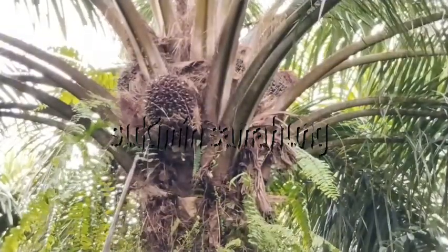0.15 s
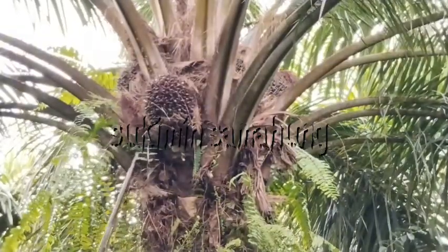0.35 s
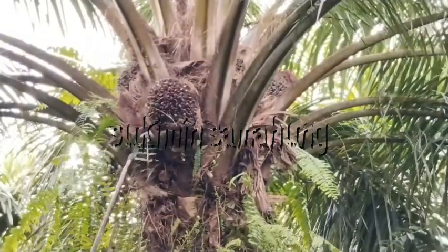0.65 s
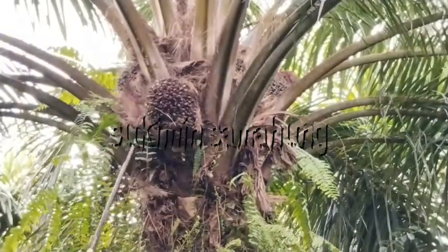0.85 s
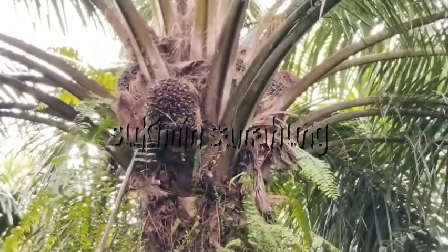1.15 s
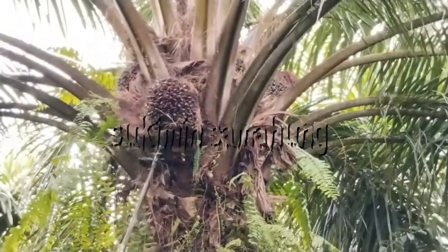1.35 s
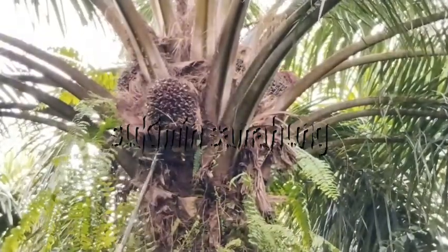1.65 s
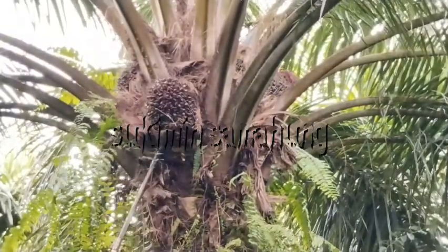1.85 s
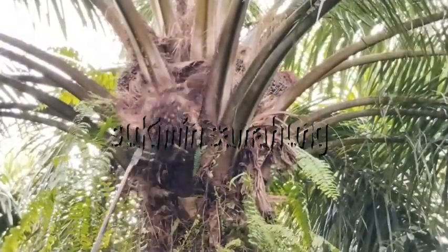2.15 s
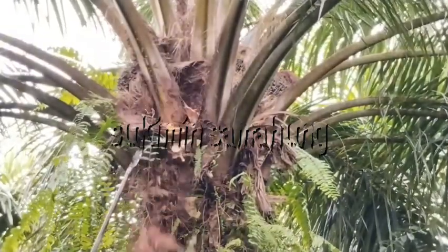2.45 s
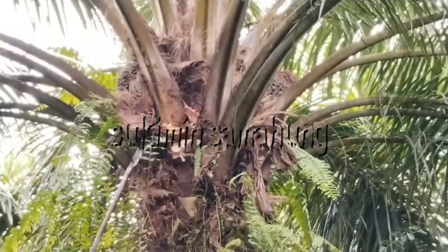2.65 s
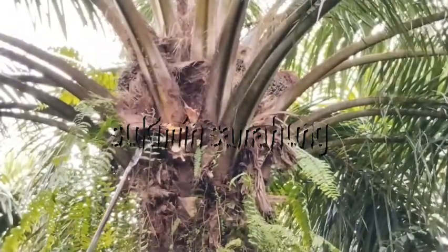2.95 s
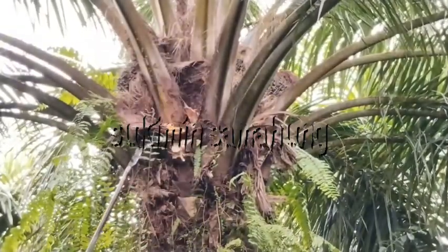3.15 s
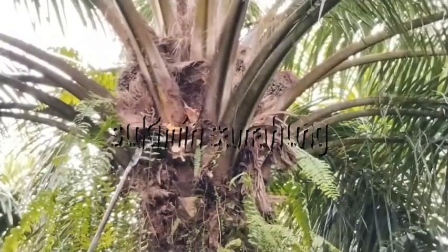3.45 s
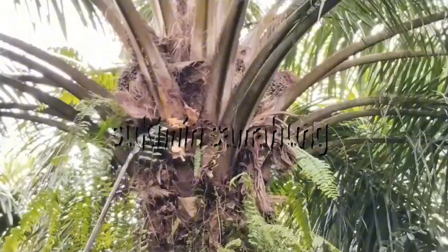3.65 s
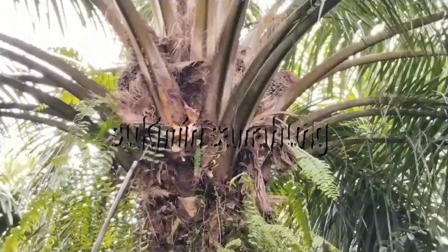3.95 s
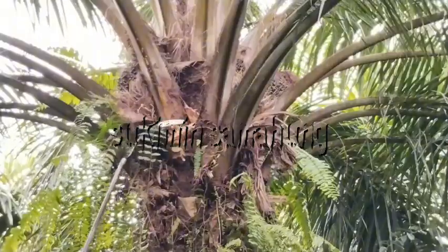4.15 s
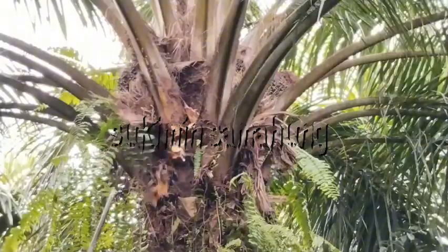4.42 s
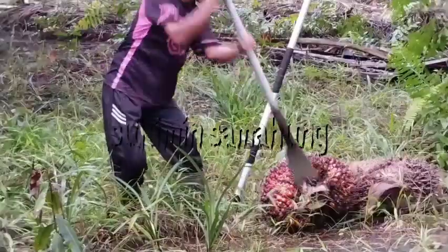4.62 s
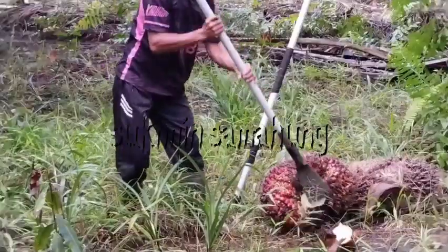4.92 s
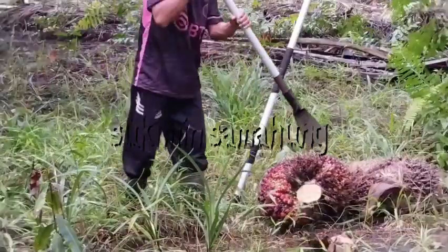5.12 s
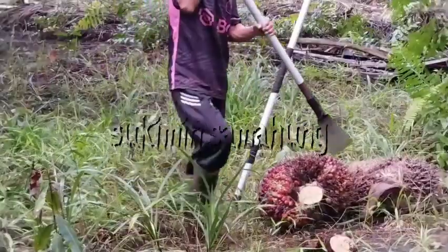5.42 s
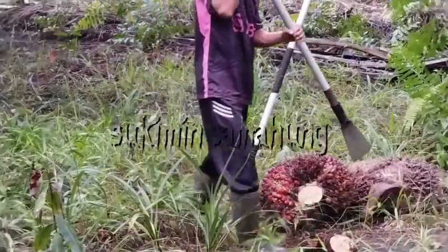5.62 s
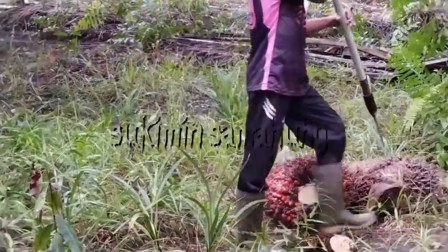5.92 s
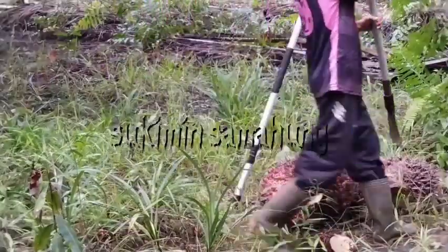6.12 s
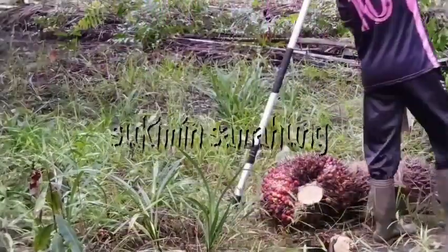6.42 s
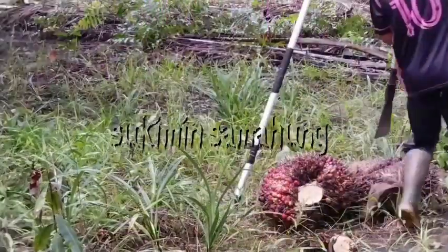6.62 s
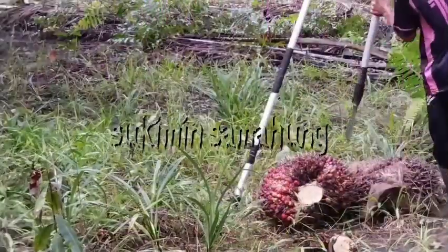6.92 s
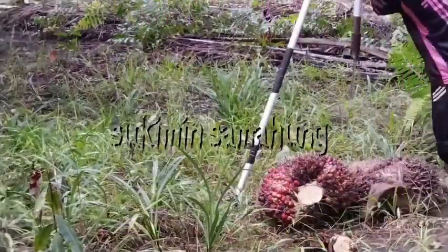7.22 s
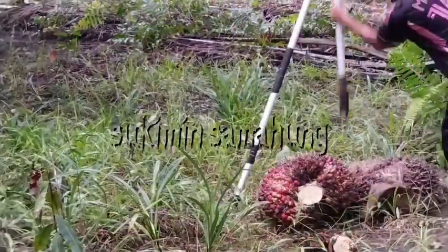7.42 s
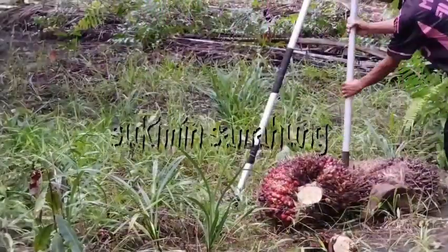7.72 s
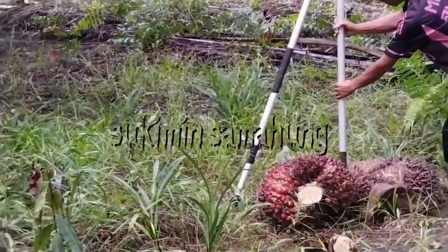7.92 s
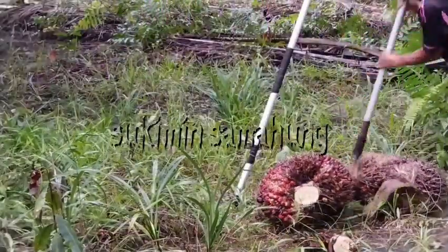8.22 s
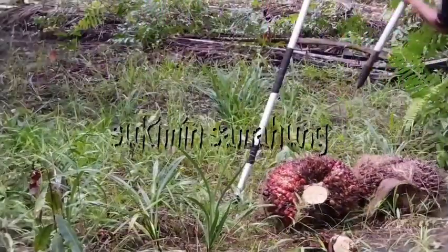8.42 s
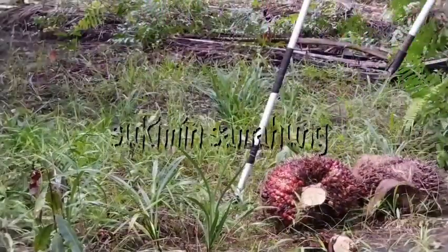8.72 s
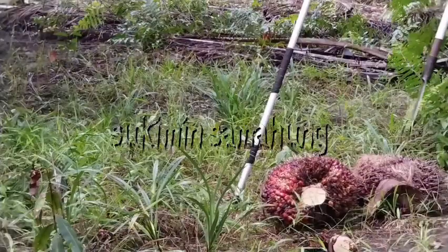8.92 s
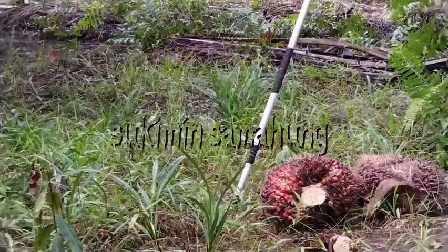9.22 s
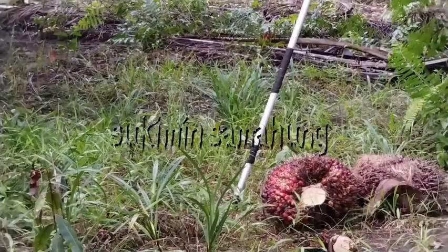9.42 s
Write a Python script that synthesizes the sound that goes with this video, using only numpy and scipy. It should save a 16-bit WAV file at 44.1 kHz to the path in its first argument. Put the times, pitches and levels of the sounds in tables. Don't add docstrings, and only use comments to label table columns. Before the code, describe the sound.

In a palm grove, a blade on a hollow pole scrapes and knocks among dry fibres. One hard cut, then a heavy fruit bunch thuds to the ground and crackling debris follows. After a tiny silence, a chisel chops a stalk, boots scuff through grass, and a second softer chop follows. Far cicadas, small birds and light wind; mono phone microphone a few steps away.

```python
import sys
import numpy as np
from scipy import signal
from scipy.fft import rfft, irfft, next_fast_len
from scipy.io import wavfile
from scipy.ndimage import uniform_filter1d, map_coordinates

SR = 44100
rng = np.random.default_rng(int(sys.argv[2]) if len(sys.argv) > 2 else 0)


def convert_level_to_amplitude(level_db):
    exponent = np.asarray(level_db, float) / 20
    return 10 ** exponent


def unload_audio(sound):
    columns = np.transpose(np.atleast_2d(sound))
    steps = np.round(np.clip(columns, -1, 1) * 32767)
    wavfile.write(sys.argv[1], SR, steps.astype(np.int16))


N = 421596


def level(x):
    return x / np.sqrt(np.mean(x ** 2))


def band(x, hz, width_hz):
    edges = np.clip([hz - width_hz / 2, hz + width_hz / 2], 15, .45 * SR)
    return signal.sosfilt(signal.butter(2, edges, "band", fs=SR, output="sos"), x)


def curve(rows):
    s, *columns = np.transpose(rows)
    return [np.interp(np.arange(N) / SR, s, c) for c in columns]


def walk(rate, size=N):
    k = int(SR / rate)
    steps = np.repeat(rng.standard_normal(size // k + 1), k)
    return level(uniform_filter1d(uniform_filter1d(steps, k), k)[:size])


def add(out, s, x):
    i = int(s * SR)
    out[i:i + len(x)] += x[:N - i]


def decay(t, t60):
    return np.exp(-np.log(1000) * t / t60)


def ring(hz, t60, rise=0.0006, grip=1.5):
    t = np.arange(SR // 4) / SR
    u = t / max(t60, .005)
    build = 1 - np.exp(-(t / rise) ** 2)
    return np.sin(2 * np.pi * hz * t) * build * np.exp(-np.log(1000) * (0.99 * u + grip * u ** 2))


def scuff(x, noise, length):
    grating = noise * np.exp(-np.arange(len(noise)) / SR / max(length, 1e-4))
    y = signal.fftconvolve(x, grating)
    return y * np.linalg.norm(x) / np.linalg.norm(y)


def grove(x, t60, wet_db):
    t = np.arange(SR // 2) / SR
    tail = rng.standard_normal(len(t)) * decay(t, t60) * (t > .006)
    return convert_level_to_amplitude(wet_db) * signal.fftconvolve(x, tail / np.linalg.norm(tail))[:N]


# full strength at in seconds,
# hold in seconds, time to fall 30 dB in seconds, level in dB, brightness in dB.
SCRAPES = [(0.018, 0.04, 0.14, -49, 0.5), (0.097, 0.021, -0.15, -55, 0), (.14, .045, 0.03, -60.5, 3),
           (0.2, 0.033, 0.24, -51, 0.5), (0.593, 0.018, 0.35, -42.5, 1.5), (0.615, 0.038, 0.19, -44.5, 1.5),
           (0.695, 0.025, -0.03, -47.5, 11), (.76, 0.028, 0.03, -60.5, 6), (0.742, 0.0056, 0.07, -49.5, 4),
           (0.97, 0.012, 5, -70, 0.5), (1.085, 0.0055, -0.74, -61.5, 7), (1.275, 0.052, 0.12, -55.5, 6.5),
           (1.51, 0.018, 0.5, -64.5, 5.5), (2.158, 0.028, 0.26, -41.5, 2), (2.195, 0.012, 0.1545, -37, 3),
           (2.206, 0.019, 0.0651, -35, 2.5), (2.24, 0.012, 0.5, -56, 4)]
FRONDS = [(2.66, .02, .1, -54, 2.5), (2.69, 0.086, 0.19, -45, 6.5), (2.808, 0.022, 0.18, -44.5, 4.5),
          (3.022, 0.021, 0.37, -39, -1.5), (3.39, 0.087, 0.19, -35.5, 0.5), (3.465, 0.082, 0.23, -36.5, -1),
          (3.96, 0.011, 0.049, -50.5, 8), (4.3, 0.011, 0.069, -56, 3), (4.578, 0.013, 0.061, -73.5, 16.5)]
CHOPS = [(4.825, 0.022, 0.028, -28.5, 0.092), (4.85, 0.032, 0.2, -44.5, -0.1),
         (7.64, 0.021, 0.18, -44.5, 1), (8.452, 0.02, 0.13, -58.5, 3.5)]
STEPS = [(5.43, 0.035, .1, -58, 0.5), (5.36, 0.021, 0.052, -88, 4), (5.5, 0.035, 0.13, -53, 4.5),
         (5.575, 0.059, .1, -58, -1), (5.64, 0.041, 0.44, -57, -0.5), (5.715, 0.058, 0.061, -66, -0.5),
         (6.28, 0.04, 0.2, -67, 9.5), (6.38, 0.011, 0.08, -76, 0), (6.62, 0.022, .15, -75, 2),
         (6.73, 0.053, 0.097, -77, 1), (7.03, 0.029, 0.033, -74, 8), (7.32, 0.18, 0.092, -75, 6),
         (8.01, .01, 0.091, -73.5, 11.5), (8.315, 0.014, 0.27, -67.5, 2), (8.61, 0.033, 0.17, -64.5, 9),
         (8.814, .02, 0.24, -77, 6)]
# rise in seconds, then pole body, fibre, leaf crackle and dry hiss in dB.
SCRAPE_TOUCH = (0.037, 0.1, -0.88, -0.79, -1.4)
FROND_TOUCH = (0.0274, -13.5, -15.5, -4, 1)
CHOP_TOUCH = (.006, -14, -11, 4, -2)
STEP_TOUCH = (0.0643, 2.5, -11, 0.3, -0.5)
# time in seconds, level in dB.
STIRRING = [(0, -75), (.4, -63), (1.6, -68.5), (2.5, -65.5), (2.95, -61), (3.3, -60), (3.63, -48),
            (4.15, -59), (4.5, -60.5), (4.6, -79), (5.3, -75), (5.85, -83.5), (7.0, -82.5), (8.2, -79),
            (9.56, -94.5)]
STIR_COLOUR = (-18, -17.5, 1.65, -1.1)
LINGER = (0.29, 0.29, 0.91, 0.89)


def contacts():
    t = np.arange(N) / SR
    power = convert_level_to_amplitude(curve(STIRRING)[0] + np.array(STIR_COLOUR)[:, None]) ** 2
    lean = np.array([-1.7, -0.53, 0.086, 1])
    kinds = (SCRAPES, SCRAPE_TOUCH), (FRONDS, FROND_TOUCH), (CHOPS, CHOP_TOUCH), (STEPS, STEP_TOUCH)
    for rows, (rise, *colour) in kinds:
        for s, hold, fall, db, bright_db in rows:
            i = slice(max(int((s - 2 * rise) * SR), 0), int((s + hold + 4 * fall) * SR))
            falls = max(fall, .01) * np.array(LINGER)[:, None]
            shape = np.minimum(0, 30 * np.minimum((t[i] - s) / rise, (s + hold - t[i]) / falls))
            part_db = np.array(colour) + bright_db * lean
            power[:, i] += convert_level_to_amplitude(db + shape + part_db[:, None]) ** 2
    return 10 * np.log10(power)


# centre in Hz, width in Hz.
RUSTLE_BANDS = [(250, 130), (500, 370), (1150, 950), (2050, 1100), (3700, 2300), (6200, 3100), (9300, 3600),
                (13600, 3200)]


def rustle():
    click_db = np.minimum(1.2 * rng.exponential(size=N), 7)
    clicks = (rng.random(N) < .07) * rng.standard_normal(N) * convert_level_to_amplitude(click_db)
    swarm = (.65 * level(clicks) + rng.standard_normal(N)) * convert_level_to_amplitude(2.0 * walk(110))
    body, fibre, leaf, dry = contacts()
    gains = (body - 3, 0.65 * body + 0.3 * fibre - 1.5, fibre, (fibre + leaf) / 2 - 4,
             leaf - 2.5, np.minimum(leaf, dry) - 2.5, dry - 2.5, dry - 9)
    size = next_fast_len(N)
    spectrum, f = rfft(swarm, size), np.fft.rfftfreq(size, 1 / SR)
    out = np.zeros(N)
    for db, (hz, width_hz) in zip(gains, RUSTLE_BANDS):
        part = irfft(spectrum / (1 + (2 * (f - hz) / width_hz) ** 4), size)[:N]
        out += convert_level_to_amplitude(db + 1.2 * walk(45)) * level(part)
    return out


def patchy(x):
    patch_db, patch_hz, patch_s = 1.5, 300, .012
    hz, t, z = signal.stft(x, SR, nperseg=512)
    where = np.meshgrid(hz / patch_hz, t / patch_s, indexing="ij")
    field = map_coordinates(rng.standard_normal((128, 2048)), where, order=1)
    return signal.istft(z * convert_level_to_amplitude(patch_db * field - 0.5), SR, nperseg=512)[1][:N]


# start in seconds, peak in dB, dull part in dB, t60 in seconds.
SNAPS = [(0.0149, -43, -28, 0.043), (0.046, -27, -37, 0.12), (0.0922, -30, -26, 0.05),
         (0.2008, -30, -31, 0.021), (0.284, -26, -9.5, 0.053), (0.574, -30, 0, 0.074),
         (0.6796, -24, -0.5, 0.074), (2.149, -31, 7, 0.033), (2.204, -15.5, -8, 0.055),
         (2.6873, -29.5, -11.5, 0.23), (2.7208, -27.5, -15, 0.12), (2.8132, -28, -12, 0.076),
         (3.019, -14.5, -4, 0.063), (3.3665, -29, -4, 0.05), (3.3936, -22, -9.5, 0.18),
         (3.4635, -19, -13.5, 0.039), (3.546, -23.5, -25, 0.087), (3.9642, -32, -24, 0.037),
         (4.8222, -15.5, -6, 0.048), (4.838, -19, -20, 0.03), (5.4965, -35, -9.5, 0.11),
         (6.9985, -51, -20.5, 0.057), (7.026, -49.5, -23, 0.05), (7.637, -20, 1, 0.027),
         (7.651, -20, -1.5, 0.072), (8.4525, -33.5, -9, 0.079)]


def snaps():
    out, t = np.zeros(N), np.arange(SR // 4) / SR
    for s, db, dull_db, t60 in SNAPS:
        splinter_db = np.minimum(2.0 * rng.exponential(size=len(t)), 9)
        splinters = rng.standard_normal(len(t)) * convert_level_to_amplitude(splinter_db)
        bright = level(band(splinters, 7600, 11000))
        dull = level(band(splinters, 1200, 1300))
        burst = bright + convert_level_to_amplitude(dull_db) * dull
        add(out, s, convert_level_to_amplitude(db - 11.5) * burst * decay(t, max(t60, .005)) * np.minimum(t / 0.0012, 1))
    return out


# start in seconds, peak in dB, main ring in Hz, upper ring in Hz,
# upper ring in dB.
POLE_KNOCKS = [(0.103, -32, 270, 1620, -16), (0.627, -26.5, 256, 770, -5), (0.736, -28, 430, 804, 0),
               (0.953, -47, 440, 1240, -11.5), (1.03, -16, 272.6, 1040, -7.5), (1.463, -27, 251, 825, -8),
               (1.517, -47.5, 470, 1140, -27), (3.393, -28.5, 369, 797, -34), (3.914, -58.5, 566, 1065, 16),
               (4.11, -55.5, 199, 1400, 5), (4.308, -50, 479, 1646, 5.5), (5.147, -66, 206, 1630, -3)]
BOOT_KNOCKS = [(5.437, -40, 494, 1020, -17), (5.496, -22, 490, 1000, -8.5), (5.568, -27, 343, 810, -22),
               (5.602, -28.5, 282, 795, -17), (5.635, -23.5, 584, 760, -17), (5.736, -35.5, 730, 724, -7),
               (6.247, -45.5, 395, 1395, -25), (6.62, -56.5, 490, 1210, -12.5),
               (6.766, -56.5, 476, 1190, -13), (6.997, -53, 443, 1190, -20), (8.311, -47.5, 700, 1060, -7),
               (8.803, -59, 500, 1190, -21)]
SCUFF_S = 0.0059


def knocks():
    out = np.zeros(N)
    rows = [(*r, 0.081, 0) for r in POLE_KNOCKS] + [(*r, 0.035, SCUFF_S) for r in BOOT_KNOCKS]
    for s, db, hz, upper_hz, upper_db, t60, spread in rows:
        grit = rng.standard_normal(1200)
        x = ring(hz, t60, 0.0044)
        x += .5 * ring(hz * (1.193 + 0.1 * grit[0]), 1.1 * t60)
        x += 0.78 * ring(hz * (1.91 + 0.026 * grit[1]), 0.58 * t60, 0.0086)
        upper = ring(upper_hz, 0.76 * t60, 0.0007) + 0.19 * ring(0.369 * upper_hz, 1.2 * t60)
        x += convert_level_to_amplitude(upper_db) * upper
        add(out, s, -convert_level_to_amplitude(db) * (scuff(x, grit, spread) if spread else x))
    return out


# start in seconds, level in dB.
POLE_TAPS = [(.738, -44.5), (1.028, -41.5), (1.081, -54), (1.15, -54), (1.272, -43.5), (1.3, -43.5),
             (4.307, -54)]
POLE_DB = (-10, 3, -1, 1.5, -10, -10.5, -10)


def pole_taps():
    out = np.zeros(N)
    pole_hz = 507.5
    for s, db in POLE_TAPS:
        x = sum(convert_level_to_amplitude(db + g) * ring(pole_hz * k, 0.059, 0.00083) for k, g in enumerate(POLE_DB, 3))
        add(out, s, scuff(x, rng.standard_normal(1200), SCUFF_S))
    return out


# start in seconds, level in dB, ground in Hz, slap in Hz, slap in dB.
THUDS = [
    (3.0207, -15, 57, 383, 5.5),
    (4.868, -26, 112, 252, 17),
    (7.666, -38, 98, 207, 12),
]


def thuds():
    out, t = np.zeros(N), np.arange(SR // 2) / SR
    t60, rumble_db, rumble_cycles = 0.22, -13.5, 18
    for s, db, hz, slap_hz, slap_db in THUDS:
        add(out, s, -convert_level_to_amplitude(db + slap_db) * ring(slap_hz, 5 / slap_hz, 0.26 / slap_hz))
        ground = ring(hz, t60) + 0.085 * ring(2.0 * hz, 0.6 * t60)
        ground += 0.14 * ring(0.56 * hz, t60) + 0.35 * ring(1.4 * hz, 0.8 * t60)
        add(out, s + .5 / slap_hz, convert_level_to_amplitude(db) * ground)
        soil = band(band(rng.standard_normal(len(t)), 1.6 * hz, 2.5 * hz), 1.6 * hz, 2.5 * hz)
        soil = level(soil) * np.minimum(t / 0.017, 1)
        add(out, s, convert_level_to_amplitude(db + rumble_db) * soil * decay(t, rumble_cycles / hz))
    return out


# pitch in Hz, level in dB, t60 in seconds.
BLADE = [(1232, -3, 0.083), (1567, 0, 0.066), (1784, -13, 0.5), (1690, -21, .3), (3500, -10, 0.22),
         (1863, -5, 0.06), (2480, -13.5, 0.28), (3580, -13, 0.16), (2852, -17.5, 0.087), (3950, -12.5, .06),
         (5400, -18.5, .06), (8055, -7.5, 0.2), (9930, -10.5, 0.12)]
# start in seconds, level in dB, share of the free ring time (low while buried).
CLINKS = [
    (4.825, -19, 0.097),
    (7.638, -48, 0.39),
    (8.436, -44, 0.49),
    (8.448, -43, 0.82),
    (8.475, -59, 0.56),
]


def chisel_clinks():
    out = np.zeros(N)
    flutter_db = 6
    for s, db, free in CLINKS:
        grate = rng.standard_normal(600) * np.hanning(600)
        for hz, mode_db, t60 in BLADE:
            waver = convert_level_to_amplitude(db + mode_db + flutter_db * walk(150, size=SR // 4))
            add(out, s, scuff(waver * ring(hz, free * t60, .001, 0), grate, 0.05))
    return out


# start in seconds, peak in dB, pitch in Hz, t60 in seconds.
PINGS = [(.012, -38.5, 4040, 0.048), (.046, -36, 4150, 0.033), (.045, -39, 720, 0.046),
         (.092, -41, 4020, .03), (.094, -38, 1150, 0.03), (.13, -48, 3350, 0.044), (.199, -44, 4500, .03),
         (0.198, -39, 3030, .03), (.282, -41, 4400, .04), (.282, -42, 1430, 0.032),
         (0.575, -38, 346, 0.091), (.606, -34, 300, 0.096), (.64, -31, 264, 0.12), (.679, -32, 4250, 0.033),
         (.738, -39, 4000, 0.036), (.75, -44.5, 2310, 0.079), (1.235, -52, 505, 0.045),
         (1.271, -42.5, 1250, 0.038), (1.295, -42, 2170, 0.046), (1.305, -46, 1190, 0.037),
         (1.305, -46, 300, 0.071), (1.325, -49, 2050, 0.043), (1.365, -54, 1300, 0.025),
         (2.13, -41, 3480, 0.024), (2.159, -32, 1470, 0.05), (2.205, -27, 1496, 0.056),
         (2.208, -27.5, 738, 0.04), (3.381, -35, 89, 0.088), (3.476, -34.5, 218, 0.14),
         (4.705, -65, 1000, 0.028), (4.705, -62, 510, 0.04), (4.828, -35.5, 300, 0.2),
         (4.871, -25, 300, 0.034), (5.147, -60, 1850, .03), (5.352, -57.5, 510, 0.073),
         (5.432, -54, 2100, .03), (5.456, -43.5, 500, 0.051), (5.49, -43, 1390, .03),
         (5.634, -52, 1900, .03), (5.647, -33, 554, 0.037), (5.664, -36, 496, 0.037),
         (5.697, -44, 500, 0.04), (8.452, -57, 3760, 0.033), (8.453, -39, 1700, 0.035),
         (8.585, -60, 3570, 0.036), (8.594, -57, 2000, .03), (8.612, -57, 2200, 0.028),
         (8.625, -73, 3950, 0.11),
         (8.671, -32, 456, 0.026), (8.625, -66, 1050, 0.073), (3.021, -33, 1700, .06),
                (2.8, -35.5, 2400, .04), (3.6, -38, 600, .05), (4.822, -22, 1750, 0.038),
                (5.489, -43.5, 600, .025), (7.637, -37, 2600, 0.043), (7.651, -36, 2800, 0.043),
                (8.316, -59, 660, 0.069), (6.2, -59, 2230, 0.05), (6.996, -62, 2700, 0.046),
                (7.025, -58.5, 2700, 0.072), (8.5, -61, 1650, .06), (1.4, -39, 4600, 0.09),
                (1.273, -52, 4600, .04), (1.262, -43, 2200, 0.046), (2.1, -46, 750, .03),
                (0.022, -38.5, 1100, 0.069), (0.23, -43, 650, 0.056), (5.497, -32, 310, 0.025)]


def pings():
    out = np.zeros(N)
    rise_s, scuff_s = 0.0022, 0.0032
    for s, db, hz, t60 in PINGS:
        x = ring(hz, t60, rise_s)[:SR // 8]
        add(out, s, convert_level_to_amplitude(db + 3.5) * scuff(x, rng.standard_normal(600), scuff_s))
    return out


# centre in seconds, peak in dB.
TICKS = [(.2837, -32), (.5748, -31), (.681, -33), (2.1314, -43.5), (2.205, -14), (2.687, -39), (2.698, -37),
         (2.707, -28), (2.7228, -25), (2.8125, -28), (2.819, -29), (3.3675, -26.5), (3.3725, -27),
         (3.3992, -21), (3.4065, -24), (3.447, -20), (3.4641, -15), (3.5457, -22), (3.754, -41),
         (3.915, -39), (3.9444, -32), (3.9662, -28), (4.0282, -35.5), (4.29, -35), (4.5839, -47),
         (5.5055, -34), (5.6506, -38), (7.0295, -44), (.017, -45), (.031, -34.5), (.048, -43),
         (.2015, -36.5), (7.6385, -36), (7.6466, -34), (3.48, -26), (3.516, -31), (3.429, -27.5)]


def ticks():
    tick_s = .0018
    out, n = np.zeros(N), int(tick_s * SR)
    for s, db in TICKS:
        add(out, s - tick_s / 2, convert_level_to_amplitude(db + 2.0) * level(rng.standard_normal(n)) * np.hanning(n))
    return band(out, 8100, 8000)


# start in seconds, length in seconds, from Hz, to Hz,
# level in dB.
WHISTLER = [(0.236, 0.029, 4550, 4580, -51), (1.953, 0.081, 4520, 4130, -58),
            (2.025, 0.047, 4140, 4190, -51), (2.912, 0.045, 3830, 3780, -49.5),
            (3.254, 0.017, 4500, 4480, -51), (3.29, 0.041, 4480, 4410, -46.5),
            (5.093, 0.071, 1990, 3700, -69.5), (5.325, 0.026, 1990, 2080, -68),
            (5.344, 0.075, 2000, 3880, -63), (7.12, 0.079, 4550, 4240, -55.5),
            (7.223, .05, 3640, 3760, -56.5), (7.262, 0.1, 3650, 2860, -55.5)]
WARBLER = [(1.7, 0.023, 3060, 3420, -46.5), (3.642, 0.014, 3030, 2996, -42),
           (3.667, 0.026, 2900, 3060, -56), (3.78, 0.048, 2780, 2830, -47),
           (3.866, 0.03, 2910, 3380, -38.5), (3.92, 0.035, 2840, 2860, -44.5),
           (3.988, 0.054, 2685, 2702, -44), (4.07, 0.022, 2800, 2740, -52),
           (4.112, 0.0092, 2650, 2590, -45.5), (5.765, .025, 3020, 2980, -69),
           (5.815, 0.052, 2930, 2926, -62.5), (5.945, 0.019, 2860, 2900, -63),
           (5.975, .04, 2970, 2950, -64.5), (6.055, 0.03, 2764, 2836, -61.5),
           (6.095, 0.045, 2740, 2870, -66.5), (6.143, 0.035, 2570, 2590, -56.5),
           (8.075, 0.025, 3490, 3580, -71.5), (8.262, 0.039, 2860, 2980, -69.5)]
FAR_BIRD = [(.34, 0.028, 4330, 4330, -65), (.415, .025, 4250, 4250, -63), (.458, 0.1, 4230, 4150, -60.5),
            (1.785, 0.041, 3280, 3310, -57), (3.195, 0.014, 3310, 3520, -49.5),
            (3.225, 0.037, 4080, 3345, -54.5), (5.142, 0.035, 3870, 3680, -63),
            (5.18, .055, 3780, 3760, -70), (1.39, 0.023, 3330, 2880, -64)]
# start in seconds, level in dB.
CHIPS = [(5.909, -70), (6.027, -70), (6.115, -62), (6.166, -65.5)]


def birds():
    out = np.zeros(N)
    fade, twist = walk(300), walk(300)
    notes = [(*r, 0.32) for r in WHISTLER] + [(*r, 0.37) for r in WARBLER] + [(*r, 0.76) for r in FAR_BIRD]
    notes += [(s, 0.023, 1930, 2230, db, 0.5) for s, db in CHIPS]
    for s, length, from_hz, to_hz, db, smear in notes:
        u = np.linspace(0, 1, int(length * SR))
        i = int(s * SR) + np.arange(len(u))
        glide_hz = from_hz + (to_hz - from_hz) * u ** 0.75
        phase = 2 * np.pi * np.cumsum(glide_hz) / SR
        note = (1 - smear + smear * fade[i]) * np.sin(phase) + smear * twist[i] * np.cos(phase)
        add(out, s, convert_level_to_amplitude(db) * note * np.sin(np.pi * u) ** 0.28)
    harsh = rasp()
    return out + grove(out, 0.26, -1.5) + harsh + grove(harsh, 0.39, -11.5)


# level in dB, pitch in Hz, width in Hz.
RASP = (-55.5, 3250, 760)
RASP_S = (7.29, 7.5)


def rasp():
    (start, end), (db, hz, width_hz) = RASP_S, RASP
    t = np.arange(N) / SR
    breath = np.clip(np.minimum((t - start) / 0.034, (end - t) / 0.013), 0, 1)
    throat = rng.standard_normal(N) * convert_level_to_amplitude(1.4 * walk(120)) * breath
    throat *= convert_level_to_amplitude(5.6 * np.exp(-((t - start - 0.09) / 0.031) ** 2) - 3.5)
    return convert_level_to_amplitude(db) * 7.4 * (band(throat, hz, width_hz) + 0.46 * band(throat, 1.34 * hz, width_hz))


# pitch in Hz, width in Hz, level in dB.
CICADAS = [(5504, 260, -4.5), (6907, 660, 3), (9000, 1100, -7.5), (10240, 570, -7), (14300, 1900, -11)]
# time in seconds, cicadas in dB, wind in dB.
DRONE = [(0.0, -58, -60.5), (0.67, -53.5, -55.5), (1.09, -56, -61.5), (2.02, -57, -59.5), (2.34, -54, -59),
         (2.95, -49, -57), (3.17, -51.5, -51), (3.62, -54, -52.5), (3.8, -46, -56), (4.31, -49.5, -56.5),
         (4.5, -46, -57), (4.64, -58, -60), (6.1, -58.5, -59.5), (6.47, -60, -61), (8.44, -56.5, -62.5),
         (8.73, -60, -64.5), (9.35, -58.5, -62), (9.56, -59.5, -68)]
# frequency in Hz, level in dB per Hz.
AIR = [(59, -33.5), (100, 1), (290, -15), (600, -23), (4320, -41), (5000, -10), (6500, -40), (11000, -120)]


def background():
    chorus_db, wind_db = curve(DRONE)
    chorus = np.zeros(N)
    for hz, width_hz, db in CICADAS:
        voices = band(band(rng.standard_normal(N), hz, 1.93 * width_hz), hz, 2.4 * width_hz)
        chorus += convert_level_to_amplitude(db + 2.9 * walk(5.2)) * level(voices)
    wind = convert_level_to_amplitude(walk(5.4)) * band(rng.standard_normal(N), 33, 66)
    hz, db = np.transpose(AIR)
    colour = convert_level_to_amplitude(np.interp(np.log(np.fft.rfftfreq(N, 1 / SR) + 1), np.log(hz), db))
    air = irfft(rfft(rng.standard_normal(N)) * colour, N)
    return convert_level_to_amplitude(chorus_db) * level(chorus) + convert_level_to_amplitude(wind_db) * level(wind) + convert_level_to_amplitude(-71.5) * level(air)


# from Hz, to Hz, threshold in dB, rarity.
MASKED = [(2300, 4750, -10, .45), (11000, 12800, -17, -.9)]


def thin(x):
    hz, _, z = signal.stft(x, SR, nperseg=2048)
    power = uniform_filter1d(abs(z) ** 2, size=7, axis=0)
    cicadas = power[(hz > 6500) & (hz < 7700)].mean(axis=0)
    luck = uniform_filter1d(rng.standard_normal((len(hz) // 8 + 1, z.shape[1])), size=3, axis=1)
    luck = np.repeat(luck, 8, axis=0)[:len(hz)]
    for lo, hi, db, rarity in MASKED:
        inside = ((hz > lo) & (hz < hi))[:, None]
        weak = power < cicadas * convert_level_to_amplitude(db) ** 2
        z[inside & weak & (luck > rarity)] *= .04
    return signal.istft(z, SR, nperseg=2048)[1][:N]


def scene():
    sharp = snaps()
    scatter = grove(band(sharp, 4400, 6400), .3, -14)
    work = patchy(rustle()) + sharp + scatter + ticks() + pings()
    blows = knocks() + pole_taps() + thuds() + chisel_clinks()
    mono = work + blows + birds() + background()
    return np.array([mono, mono])


def top_cut(x):
    return signal.sosfilt(signal.butter(12, 16510, fs=SR, output="sos"), x)


BREAK_S = (4.501, 4.576)


def record(dry):
    t = np.arange(N) / SR
    headroom, top_hz = .4, 15450
    rounded = headroom * np.tanh(dry[0] / headroom)
    low_pass = signal.ellip(6, .5, 45, top_hz, fs=SR, output="sos")
    gate = np.clip(np.maximum(BREAK_S[0] - t, t - BREAK_S[1]) / 0.00091, .002, 1)
    mono = thin(signal.sosfilt(low_pass, rounded)) * gate
    return top_cut(np.array([mono, mono]))


dry = scene()
out = record(dry)
unload_audio(out)
```